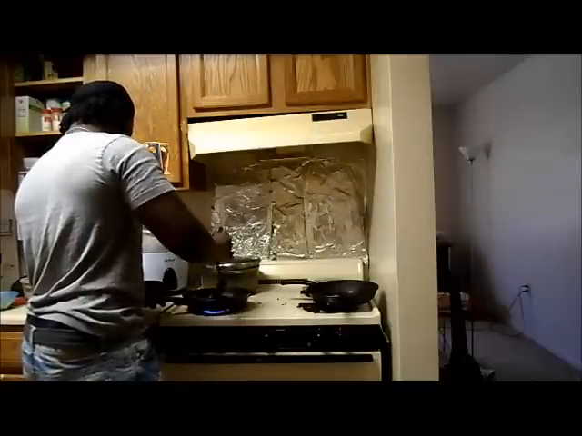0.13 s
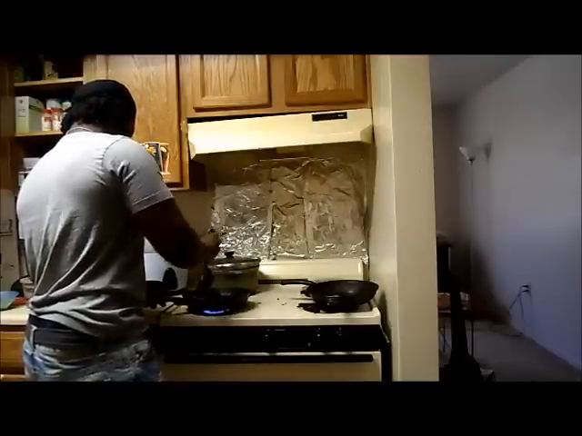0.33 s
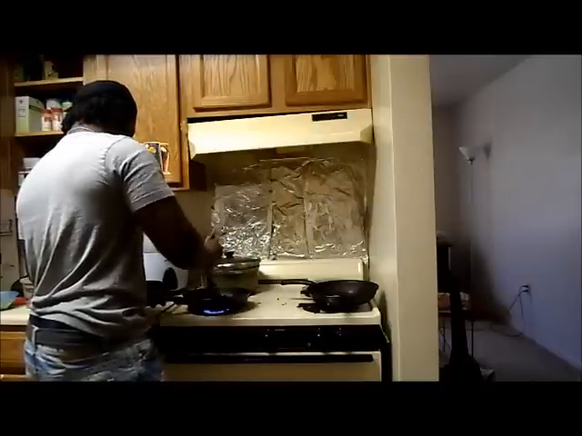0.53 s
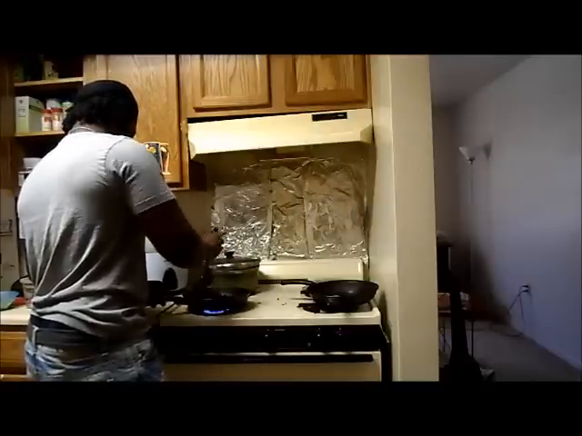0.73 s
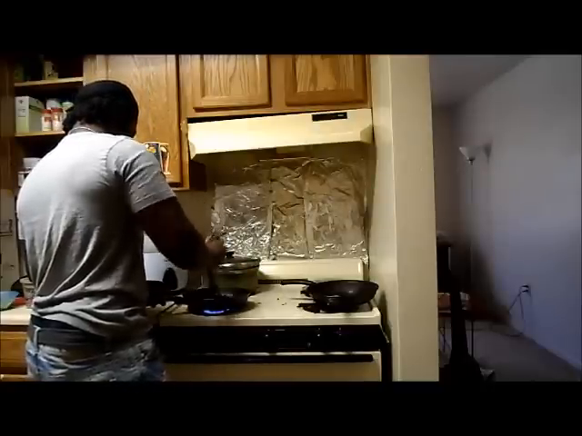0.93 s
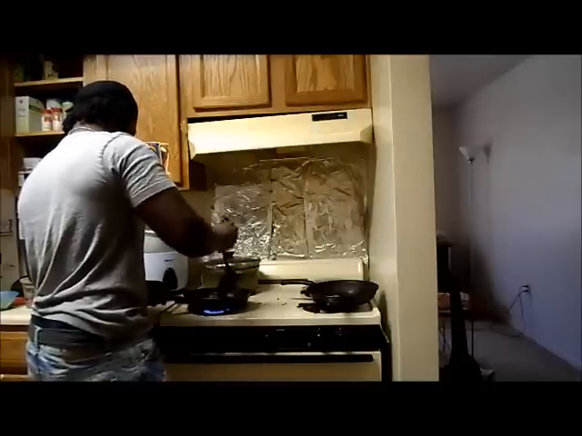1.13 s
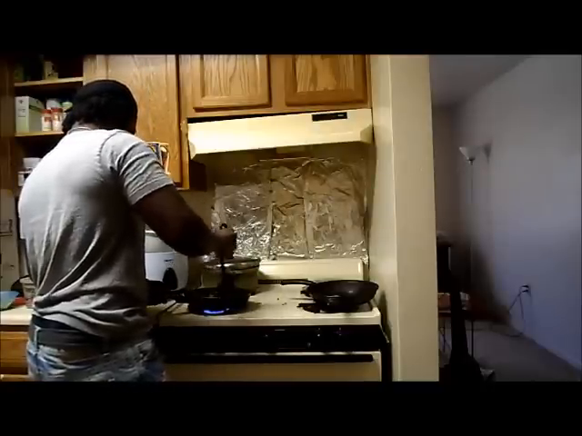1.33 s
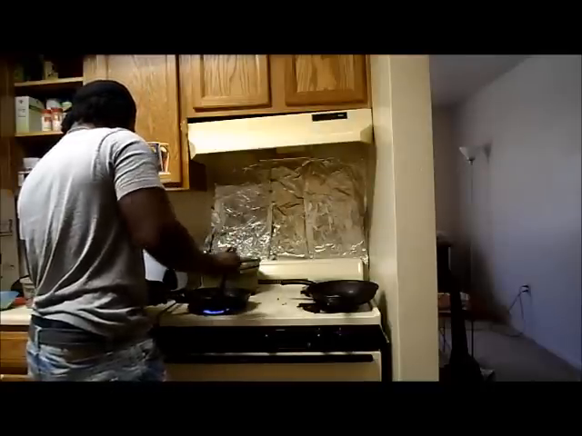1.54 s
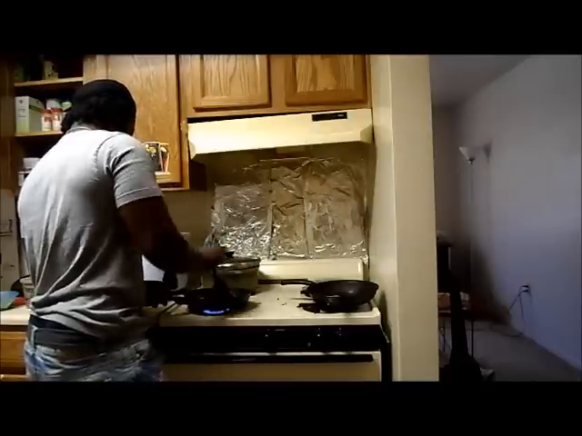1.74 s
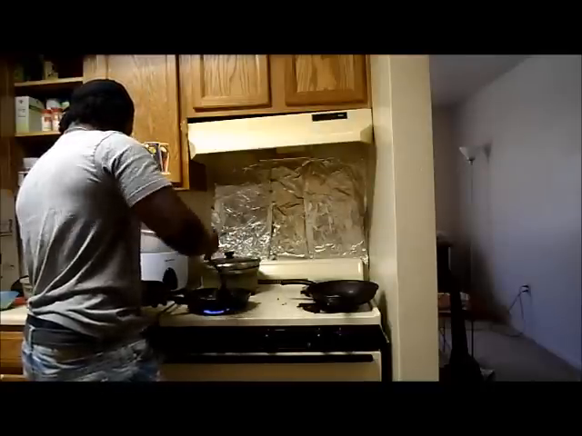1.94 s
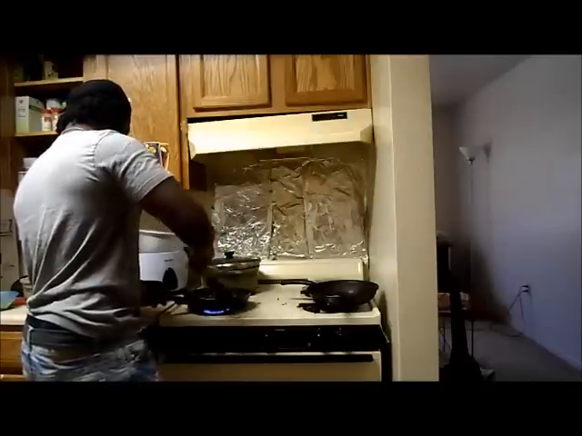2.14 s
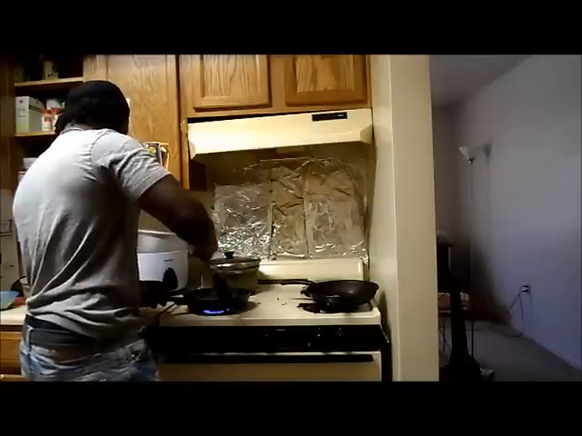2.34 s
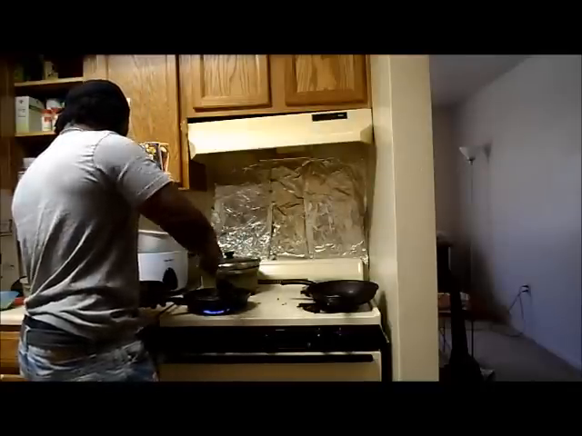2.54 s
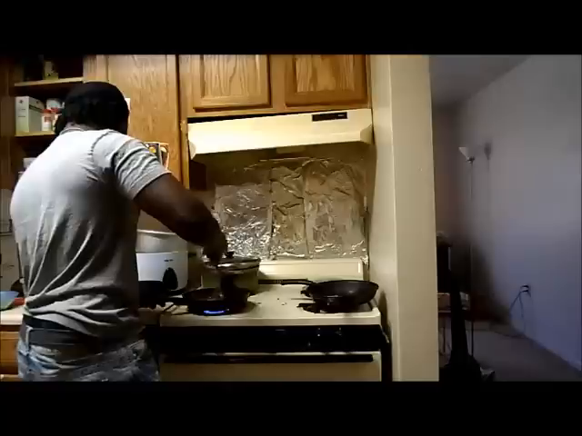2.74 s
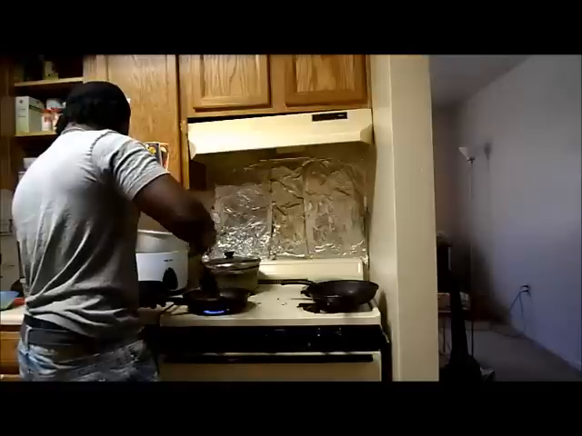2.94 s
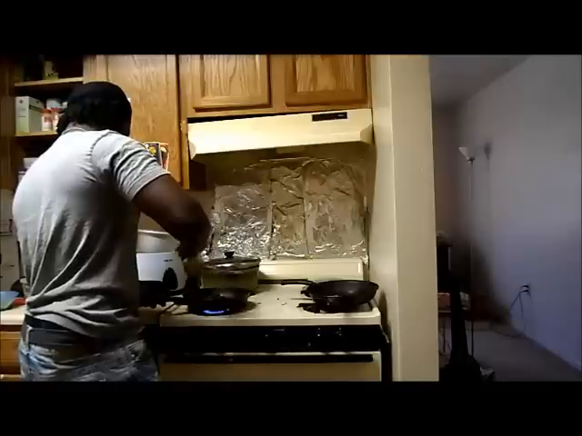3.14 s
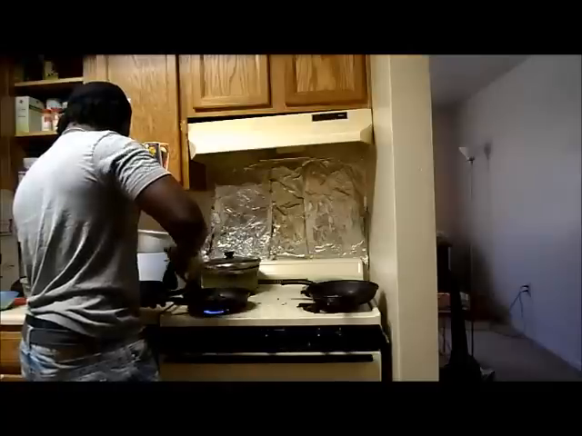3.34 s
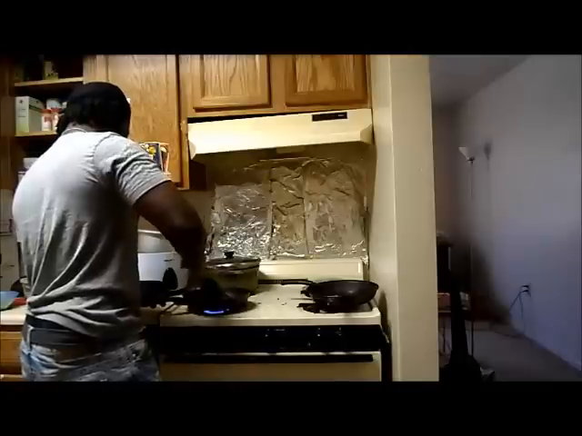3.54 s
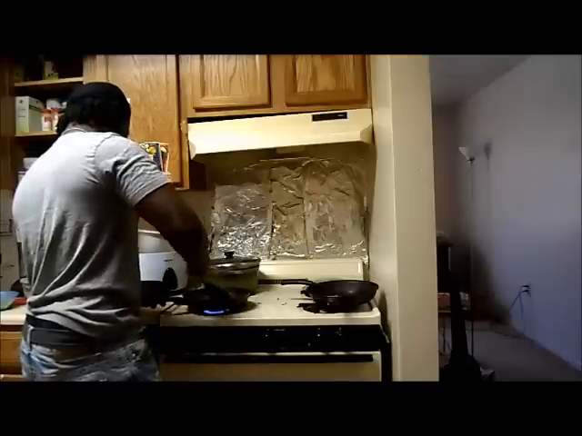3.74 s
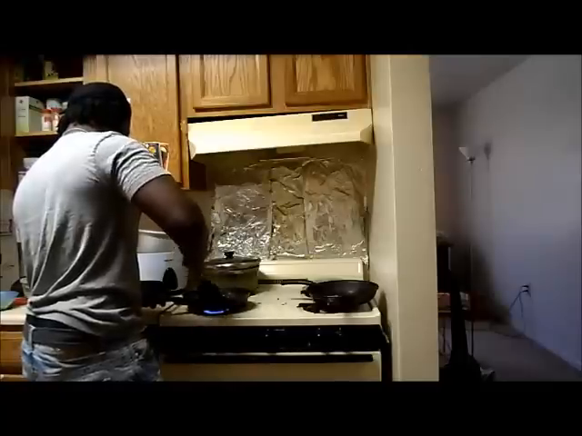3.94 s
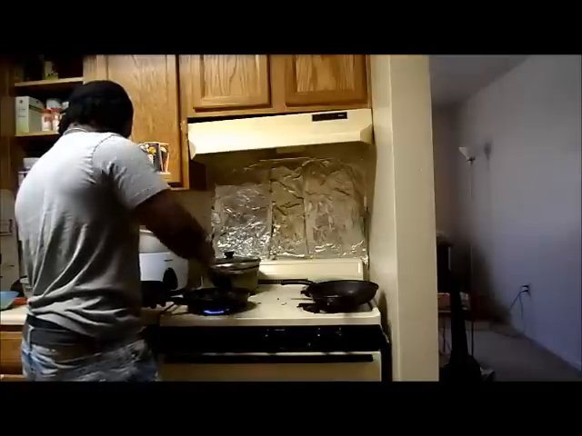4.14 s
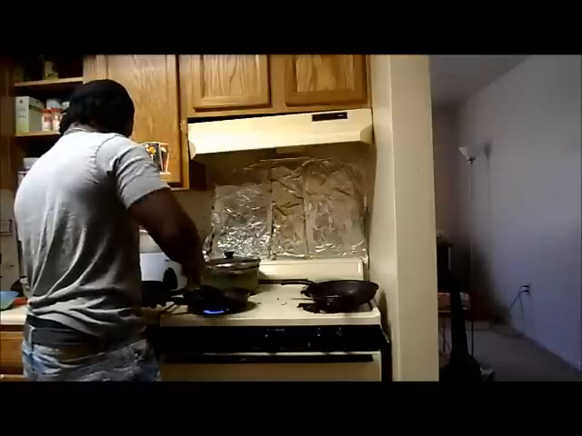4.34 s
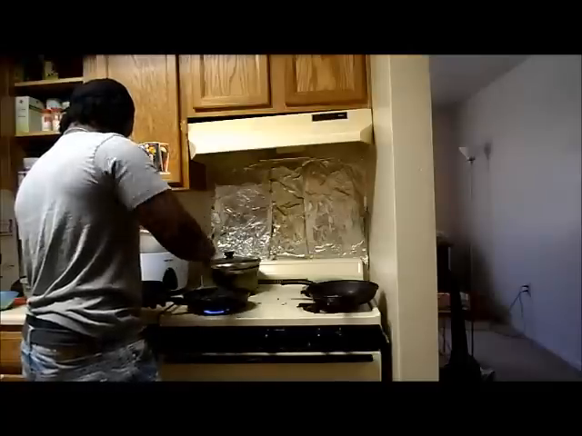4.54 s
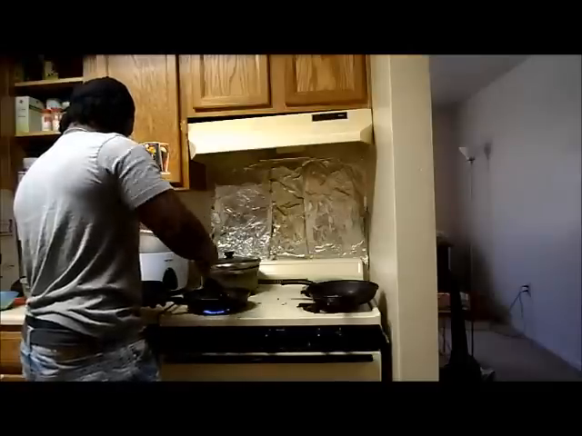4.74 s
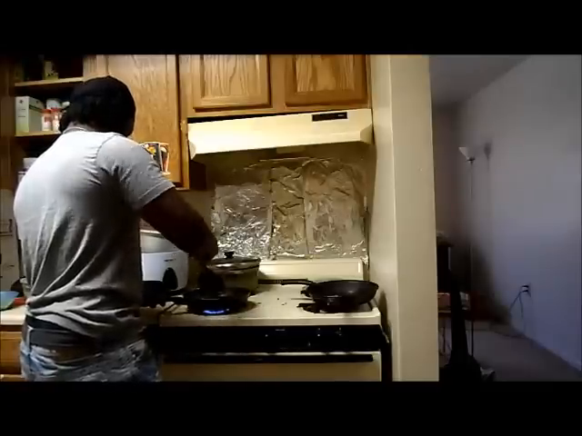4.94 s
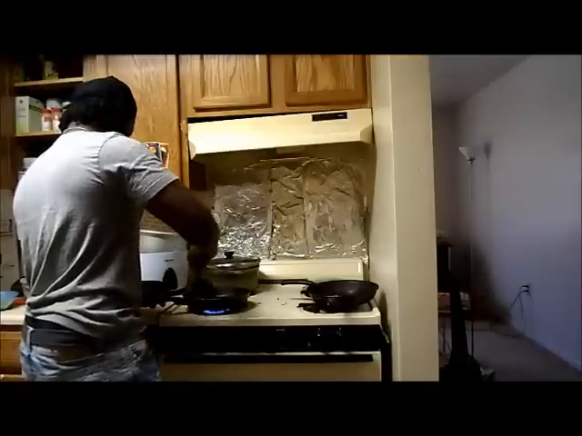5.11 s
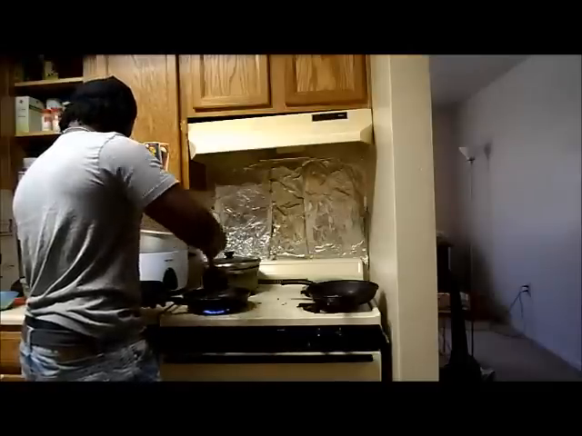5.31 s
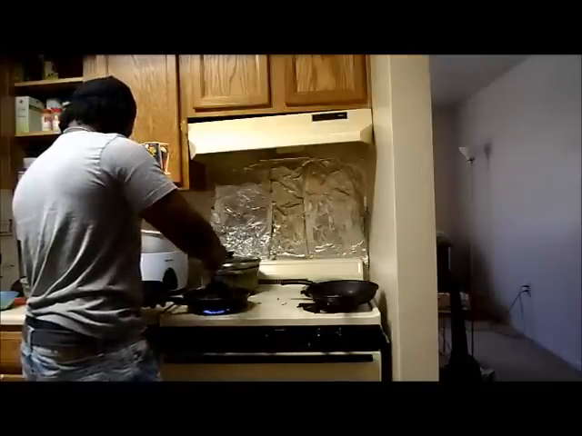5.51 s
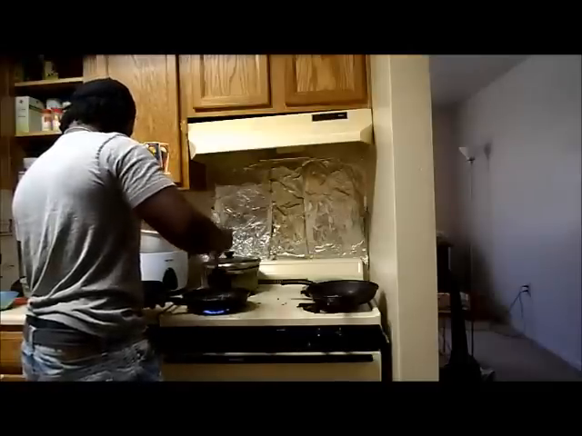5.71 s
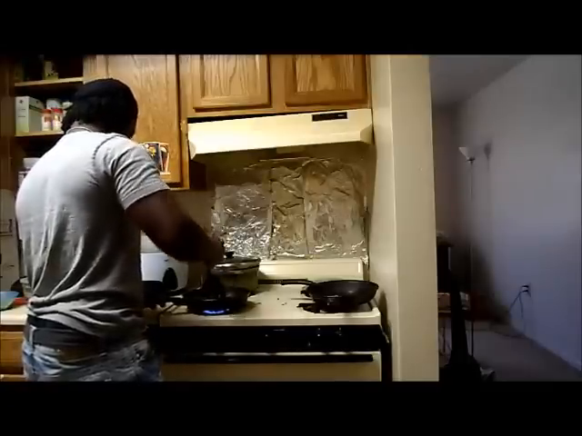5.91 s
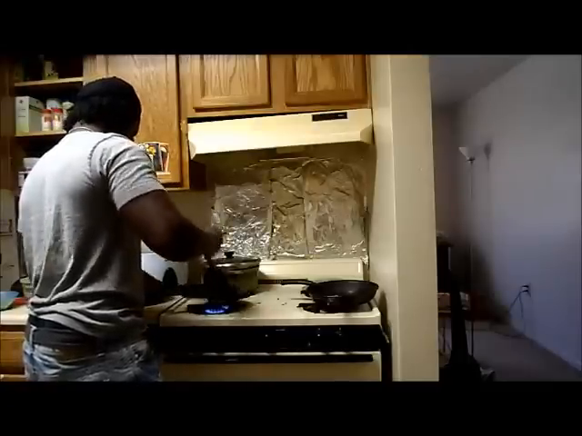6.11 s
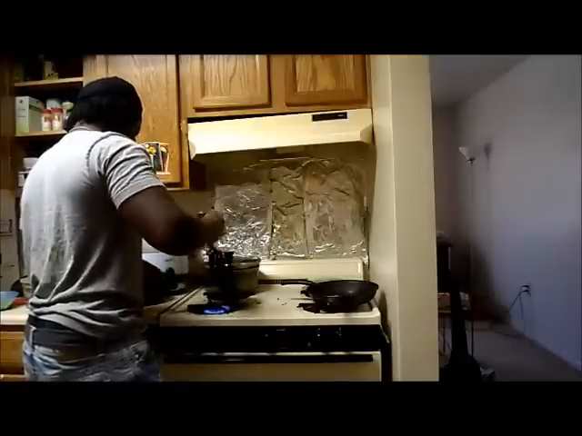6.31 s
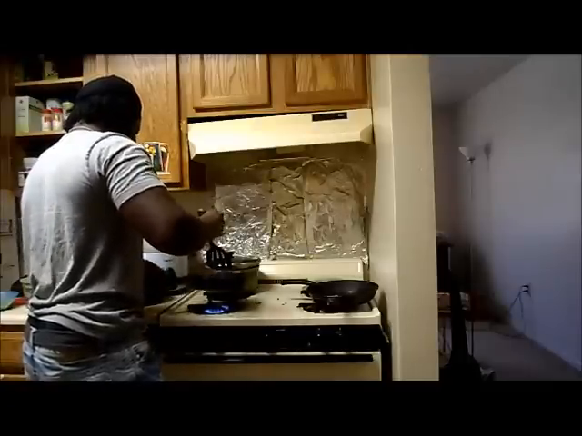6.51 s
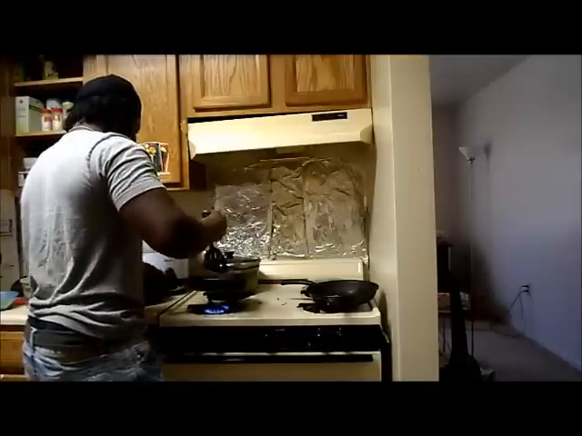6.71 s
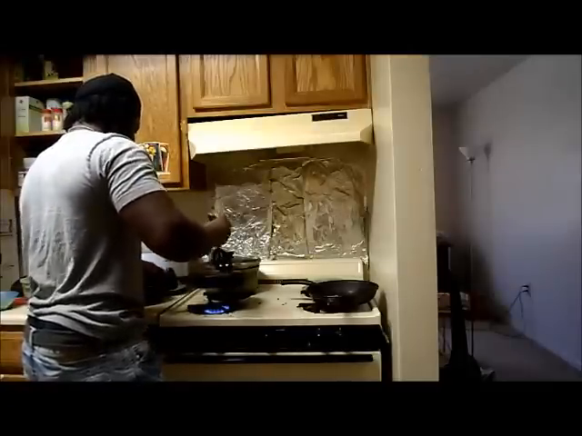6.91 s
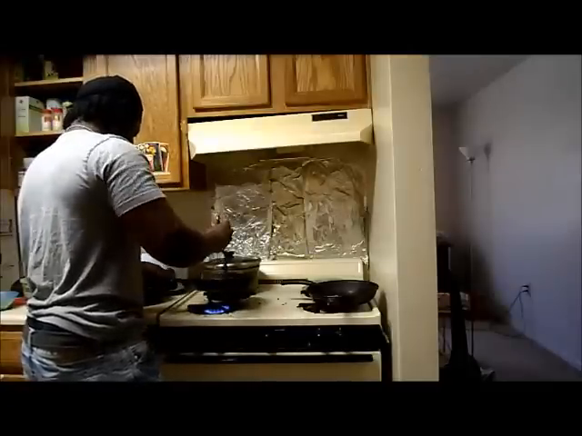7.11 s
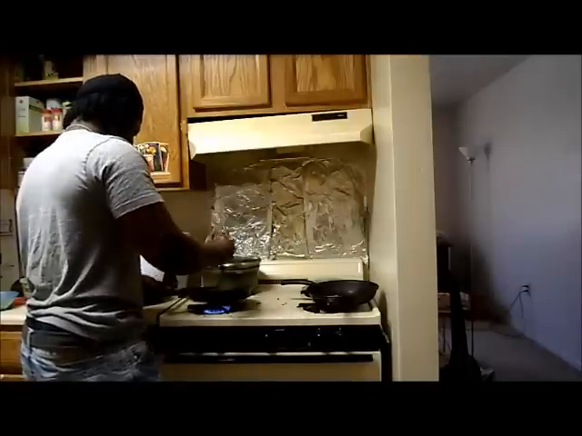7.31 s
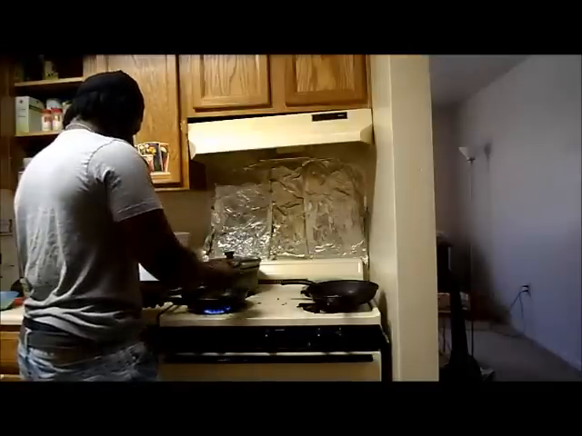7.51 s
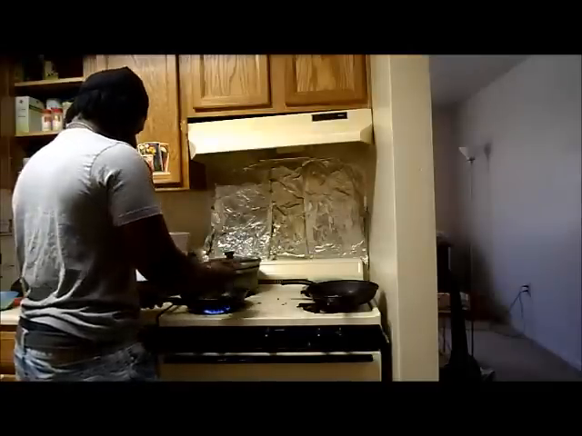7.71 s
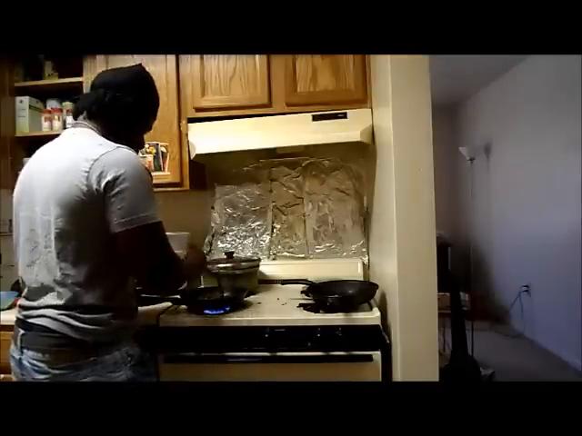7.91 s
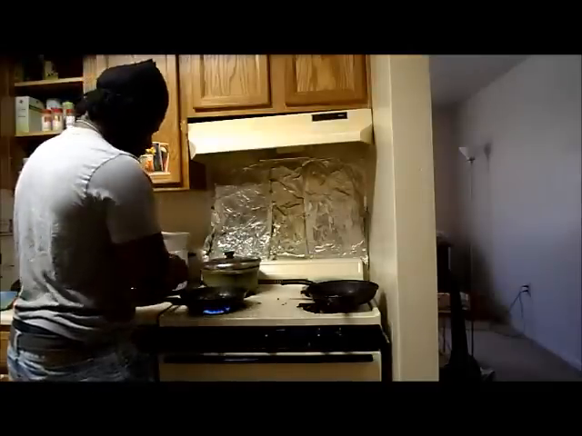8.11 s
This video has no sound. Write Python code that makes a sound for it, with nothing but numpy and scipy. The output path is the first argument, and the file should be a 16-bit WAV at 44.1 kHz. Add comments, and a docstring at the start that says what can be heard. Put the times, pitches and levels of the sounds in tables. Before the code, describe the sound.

A distant microphone picks up a quiet stove: steady thin sizzle, deep rumble, faint appliance hum. One firm dull knock comes early, then soft taps, small scrapes and occasional fat spits. Double knocks grow stronger toward six seconds. Then cookware bangs hard and bright, bounces, is struck again, and leaves a thin high ring in the short room echo.

```python
"""Stirring greens on a gas stove

Greens sizzle faintly in a frying pan, made of filtered random bubble bursts, over a low rumble and hum.
A utensil stirs, scrapes and knocks in the pan: tiny slips for the rubbing, noise bursts and short modes
for the knocks. Near the end metal clatters loudly on the stove and rings on as decaying sine modes.
The listener is across the small kitchen, so each blow arrives mostly as room sound."""
import sys
import numpy as np
from scipy import signal
from scipy.fft import rfft, irfft, next_fast_len
from scipy.io import wavfile
from scipy.ndimage import map_coordinates

SR = 44100
rng = np.random.default_rng(int(sys.argv[2]) if len(sys.argv) > 2 else 0)


def unload_audio(sound):
    """Save the sound as a 16-bit wav file, at the path given as the first command line argument."""
    columns = np.transpose(np.atleast_2d(sound))
    # keep every value between -1 and 1, then stretch to whole-number steps
    steps = np.round(np.clip(columns, -1, 1) * 32767)
    wavfile.write(sys.argv[1], SR, steps.astype(np.int16))


N = 359591

# utensil against the pan, before mix trims:
# (time [s], level [dB], thud [dB re level], click [dB re level])
KNOCKS = [(0.636, -51, 8, -14), (1.061, -30, -4.5, -22), (2.63, -58, 9.5, -11), (2.928, -43.5, -2, -26),
          (3.47, -44, 5, -16), (4.224, -50, 4, -12), (4.838, -34, -6, -9.5), (4.87, -30.5, -5, -14),
          (5.174, -38.5, -7, -8.5), (5.228, -46, 5, -17), (5.637, -36.5, -3, -8), (5.69, -47, 3.5, -14),
          (5.894, -45.5, -9, -12), (6.156, -31.5, -6, -18), (6.204, -25, -13, -5), (6.221, -24, -4, -14),
          (8.001, -32, -2.5, -13.5), (8.044, -40.5, -1, -14)]
# metal on the stove, before mix trims:
# (time [s], level [dB], thud [dB re level], click [dB re level], ring [dB])
CLATTER = [(7.136, -17, -3, -2.5, -17.5), (7.169, -14, -6.5, -3, -21.5), (7.185, -23.5, -0.5, 9.5, -28.5),
           (7.274, -26, -5, -5.5, -38), (7.296, -33, -17.5, 3.5, -51), (7.563, -20.5, -9, -2.5, -31),
           (7.575, -16, -5, -8.5, -35), (7.716, -21, -6, -4.5, -35.5), (7.737, -23, -6, -4, -39),
           (7.781, -26, -6, -5, -54)]


def amp(db):
    """Decibels to gain."""
    return 10 ** (np.asarray(db) / 20)


def unit(x):
    """Scale to rms 1."""
    return x / np.sqrt(np.mean(x ** 2) + 1e-20)


def along(points, hz):
    """Read (frequency, value) points at hz, on a log frequency axis."""
    point_hz, values = np.transpose(points)
    return np.interp(np.log(hz + 1), np.log(point_hz), values)


def curve(rows):
    """Spread (time, value) rows to one value per sample."""
    return np.interp(np.arange(N) / SR, *np.transpose(rows))


def wobble(rate):
    """A smooth random curve, with rate knots a second."""
    knots = rng.standard_normal(int(N * rate / SR) + 4)
    return map_coordinates(knots, [np.arange(N) * rate / SR])


def colour(x, db_of):
    """Filter x by a causal minimum-phase response whose gain in dB is db_of(frequency)."""
    size = 2 * next_fast_len(len(x) // 2 + SR // 8)
    gain = amp(db_of(np.fft.rfftfreq(size, 1 / SR)))
    # folding the cepstrum onto positive time gives the minimum phase
    cepstrum = irfft(np.log(gain), size)
    cepstrum[1:size // 2] *= 2
    cepstrum[size // 2 + 1:] = 0
    response = np.exp(rfft(cepstrum))
    return irfft(rfft(x, size) * response, size)[:len(x)]


def add(track, s, x):
    """Mix x into the track at time s."""
    part = track[round(s * SR):][:len(x)]
    part += x[:len(part)]


def grains(rate, spread_db):
    """Random tiny impulses, rate a second on average, a few much larger than the rest."""
    sizes = amp(spread_db * np.minimum(rng.exponential(size=N), 5))
    happens = rng.random(N) < rate / SR
    return happens * sizes * rng.choice([-1, 1], N)


def room(build_s, direct):
    """A click as the kitchen returns it: a direct crack, then echoes that thicken and die."""
    # reverberation of the kitchen: (frequency [Hz], t60 [s])
    reverb = [(100, 0.25), (300, 0.41), (1000, .34), (3000, 0.3), (10000, 0.21)]
    t = np.arange(SR * 3 // 4) / SR
    # each frequency band of a noise tail dies at its own rate
    hz, age, bands = signal.stft(rng.standard_normal(len(t)), SR, nperseg=256)
    decay = amp(-60 * age / along(reverb, hz)[:, None])
    tail = signal.istft(bands * decay, SR, nperseg=256)[1][:len(t)]
    crack = direct * np.exp(-t / 0.0023) * rng.standard_normal(len(t))
    return crack + tail * (1 - np.exp(-t / build_s))


def across_room(x, direct_db):
    """A running sound: its direct part plus the kitchen's echoes."""
    echoes = room(build_s=0.0036, direct=0)
    return amp(direct_db) * x + signal.fftconvolve(x, echoes / np.linalg.norm(echoes))[:N]


def appliances():
    """Low rumble of burner and room as filtered noise, with slightly unsteady motor and mains tones."""
    # rumble spectrum: (frequency [Hz], relative level [dB per Hz])
    rumble_shape = [(11, -59), (18, -1), (65, 0.5), (87, -6.5), (102, -8.5), (124, -3.5), (137, -10),
                    (146, -15.5), (161, -8.5), (217, -10), (259, -10.5), (306, -9.5), (438, -16),
                    (900, -21.5), (1170, -52), (1980, -120)]
    # appliance tones, before the trim: (frequency [Hz], level [dB])
    hum_tones = [(29.8, -55), (59.2, -57), (118.6, -60), (210.5, -60), (1130, -71)]
    rumble_db, drift_db, hum_trim_db = -52, 1.0, 2
    t = np.arange(N) / SR
    rumble = unit(colour(rng.standard_normal(N), lambda hz: along(rumble_shape, hz)))
    out = rumble * amp(rumble_db + drift_db * wobble(3.32))
    for hz, db in hum_tones:
        level = amp(db + hum_trim_db + 1.4 * wobble(2.13))
        out += level * np.sin(2 * np.pi * hz * t + .5 * wobble(3.5))
    return out


def sizzle():
    """Countless steam bubbles burst all over the pan as tiny impulses; a few bigger drops spit."""
    # sizzle level over time, before the trim: (time [s], level [dB])
    frying = [(0.0, -55.5), (1.8, -56), (2.04, -57), (2.71, -56), (2.87, -58.5), (6.19, -58.5), (7.1, -61)]
    # sizzle spectrum: (frequency [Hz], relative level [dB per Hz])
    hiss_shape = [(410, -24.5), (700, -17), (850, -11), (1020, -7.5), (1160, 0), (1410, -8), (2030, -2),
                  (2550, -9.5), (2830, -3.5), (4130, -7.5), (5070, -5), (5950, -7), (9520, -3.5),
                  (10100, -6), (10800, -26), (14000, -47), (22000, -120)]
    # wet greens turned onto hot metal hiss up briefly: (time [s], half width [s], rise [dB])
    flares = [(2.78, 0.049, 3.2)]
    # fat spitting, before the trim: (time [s], level [dB])
    spits = [(3.318, -42.5), (3.985, -41), (5.809, -40.5)]
    sizzle_trim_db, spit_trim_db = 2.5, -3.0
    # five spots in the pan, each with its own echoes
    bursts = sum(across_room(grains(rate=900, spread_db=3.5), direct_db=-3) for spot in range(5))
    t = np.arange(N) / SR
    flare_db = sum(db * np.exp(-((t - s) / width) ** 2) for s, width, db in flares)
    level_db = curve(frying) + flare_db + sizzle_trim_db + 0.66 * wobble(10)
    out = unit(colour(bursts, lambda hz: along(hiss_shape, hz))) * amp(level_db)
    for s, db in spits:
        spit = colour(room(build_s=0.0017, direct=3.3), lambda hz: along(hiss_shape, hz))
        add(out, s, amp(db + spit_trim_db) * spit)
    return out


def scraping():
    """Small slips of the utensil over the pan floor: steady soft stirring and a few firm strokes."""
    # firm strokes, before the room: (start [s], length [s], level [dB])
    strokes = [(3.42, 0.07, -51), (3.483, 0.048, -46), (3.546, 0.075, -50), (5.747, 0.022, -50.5),
               (5.905, 0.028, -53.5), (6.323, 0.047, -49.5)]
    # spectrum of the slips: (frequency [Hz], relative level [dB per Hz])
    scrape_shape = [(100, -34), (240, -3), (450, -8), (750, -9.5), (1300, -2), (2000, -9.5), (2800, -17),
                    (6000, -23.5), (11000, -39)]
    attack_s, release_s = 0.013, 0.013
    # soft rubbing through the greens (level before the room) and the time its fade begins
    stir_db, fade_start_s, fade_db_per_s = -68, 6.55, 11
    t = np.arange(N) / SR
    pressure = amp(stir_db - fade_db_per_s * np.maximum(t - fade_start_s, 0))
    for s, length, db in strokes:
        rise = np.clip((t - s) / attack_s, 0, 1)
        release = np.exp(-np.maximum(t - s - length, 0) / release_s)
        pressure = np.maximum(pressure, amp(db) * rise * release)
    slips = unit(colour(grains(rate=350, spread_db=2), lambda hz: along(scrape_shape, hz)))
    return across_room(slips * pressure, direct_db=-3)


def boom(growth):
    """The stove's sheet-metal body booms under every blow, growing only growth dB per dB of blow."""
    boom_hz, boom_db, attack_s, t60_s = 61, -30, 0.014, 0.59  # boom_db: for a blow of 0 dB
    hump = [(boom_hz / 4, -40), (boom_hz, 0), (boom_hz * 4, -30), (boom_hz * 32, -120)]
    out, t = np.zeros(N), np.arange(SR) / SR
    for s, db, *_ in KNOCKS + CLATTER:
        low = unit(colour(rng.standard_normal(SR), lambda hz: along(hump, hz)))
        decay = amp(boom_db + growth * db - 60 * t / t60_s)
        add(out, s, decay * (1 - np.exp(-t / attack_s)) * low)
    return out


def blow(body, build_s, direct):
    """The noisy burst of one contact, coloured by the struck body."""
    return colour(room(build_s, direct), lambda hz: along(body, hz))


def contact(x, thud_db, click_db, body_clank_db):
    """A cushioned contact thuds more and clanks less; a bare edge adds a click."""
    # the clank (upper mids) loses 0.83 dB per dB of thud
    clank_db = body_clank_db - 0.83 * thud_db
    tilt = [(330, thud_db), (600, 0), (1000, 0), (1500, clank_db), (2000, clank_db), (5000, click_db)]
    return colour(x, lambda hz: along(tilt, hz))


def ring(modes, scatter_db, waver_db, swell_s):
    """A body's modes as decaying sines, swelling and wavering as their echoes overlap."""
    t = np.arange(SR) / SR
    out = np.zeros(SR)
    for hz, db, t60 in modes:
        waver = np.interp(t, np.linspace(0, 1, 36), rng.standard_normal(36))
        level_db = db + scatter_db * rng.standard_normal() + waver_db * waver
        out += amp(level_db - 60 * t / t60) * np.sin(2 * np.pi * (hz * t + rng.random()))
    return out * (1 - np.exp(-t / swell_s))


def knocks():
    """Dull knocks in the pan: a noise burst with a short ring of pan modes."""
    # spectrum of a blow on the pan: (frequency [Hz], relative level [dB per Hz])
    pan_shape = [(60, -33), (170, -6.5), (240, 4.5), (420, 2), (620, -6), (900, 1), (1200, -3), (1650, -3),
                 (2300, -6), (3300, -4.5), (5000, -4), (10000, -11)]
    # the pan, damped by the food: (frequency [Hz], relative level [dB], t60 [s])
    pan_modes = [(232.6, 1.5, 0.35), (282, 5.5, 0.17), (361, -3, 0.34), (438.3, -3.5, 0.21),
                 (542, -7.5, 0.36), (628, -4.5, 0.3), (860, -1, 0.14), (930, -4.5, 0.3), (1103, -8, 0.24),
                 (1395, -11.5, 0.12), (1511, -4, 0.21), (1724, -10, 0.17), (1986, -14.5, 0.17),
                 (2090, -16.5, 0.38)]
    ring_trim_db, burst_trim_db = -6.5, 8.5
    out = np.zeros(N)
    for s, db, thud_db, click_db in KNOCKS:
        knock = amp(ring_trim_db) * ring(pan_modes, scatter_db=4.0, waver_db=2.5, swell_s=0.0077)
        add(knock, 0, amp(burst_trim_db) * blow(pan_shape, build_s=0.0083, direct=0.91))
        add(out, s, amp(db) * contact(knock, thud_db, click_db, body_clank_db=-5))
    return out


def overtones(count, level_db, life_s):
    """Thin metal's many weak modes over the treble, the higher ones fainter: (Hz, dB, t60 s)."""
    # range of the overtones: (lowest [Hz], highest [Hz])
    partials_hz = (1397, 9130)
    where, size, life = rng.random((count, 3)).T
    hz = partials_hz[0] * (partials_hz[1] / partials_hz[0]) ** where
    return np.column_stack([hz, level_db - 7 * where - 6 * size, life_s * (.5 + life)])


def clatter():
    """Hard metal contacts come in quick bounces and set the modes of the cookware ringing."""
    # spectrum of a blow on the stove: (frequency [Hz], relative level [dB per Hz])
    stove_shape = [(60, -9), (170, -5.5), (235, 7.5), (380, -0.5), (560, -5.5), (900, -3.5), (1150, -3.5),
                   (1600, -1.5), (2250, -7.5), (3200, -4.5), (5500, -6), (10000, -9)]
    # ringing cookware: (frequency [Hz], relative level [dB], t60 [s])
    metal_modes = [(231, -9, .3), (290, -1, .27), (360, -4, .3), (851, 0, .24), (1294, -3, .24),
                   (1555, -3, .38), (1647, -8, .48), (1745, -5, .3), (1790, -10, .5), (2007, 7, .17),
                   (2010, -19, .8), (2376, -21, .7), (2490, -7, .25), (2555, -7, .38), (2620, -15.5, .85),
                   (2685, -18, .7), (2780, -6, .4), (3193, -22.5, 2.4), (3260, -23, 1.2), (3378, -8, .46),
                   (3602, -10, .4), (3913, -18, .8), (4106, -23, 1), (4878, -23.5, .95), (5982, -22, .62),
                   (6292, -11, .25), (6745, -24, .75), (7265, -24, .7), (7760, -23, .68), (8569, -14, .25)]
    burst_trim_db, lasting_trim_db = 10.5, -9.5
    # the cookware is knocked again, which stops its first ring
    choke_s, choke_t60_s = 7.57, 0.2
    modes = np.vstack([metal_modes, overtones(count=90, level_db=-17, life_s=0.52)])
    lasting = modes[:, 2] > 2  # t60 [s]; longer modes ring on through the second knock
    t = np.arange(SR) / SR
    out = np.zeros(N)
    for s, db, thud_db, click_db, ring_db in CLATTER:
        burst = blow(stove_shape, build_s=0.0045, direct=0.22)
        add(out, s, amp(db + burst_trim_db) * contact(burst, thud_db, click_db, body_clank_db=-5.5))
        # only blows well before the second knock are choked by it
        choked_s = np.maximum(s + t - choke_s, 0) * (s < choke_s - .1)
        short_ring = ring(modes[~lasting], scatter_db=0.8, waver_db=4.0, swell_s=0.015)
        add(out, s, amp(ring_db - 60 * choked_s / choke_t60_s) * short_ring)
        # even a damped blow stirs the longest mode
        lasting_db = (db + ring_db) / 2 + lasting_trim_db
        long_ring = ring(modes[lasting], scatter_db=2.0, waver_db=4.0, swell_s=0.01)
        add(out, s, amp(lasting_db) * long_ring)
    return out


def scene():
    """Everything at the stove, in mono."""
    background = appliances() + sizzle()
    utensil = scraping() + knocks()
    return (background + utensil + boom(growth=0.59) + clatter())[None]


def record(dry):
    """Soft saturation rounds off the highest peaks, then a steep lowpass removes the top treble."""
    ceiling, top_hz = .7, 10900
    rounded = dry / (1 + np.abs(dry / ceiling) ** 4) ** (1 / 4)
    lowpass = signal.firwin(255, top_hz, window=("kaiser", 9), fs=SR)
    return signal.fftconvolve(rounded, lowpass[None], mode="same", axes=1)


dry = scene()
out = record(dry)
unload_audio(out)
```